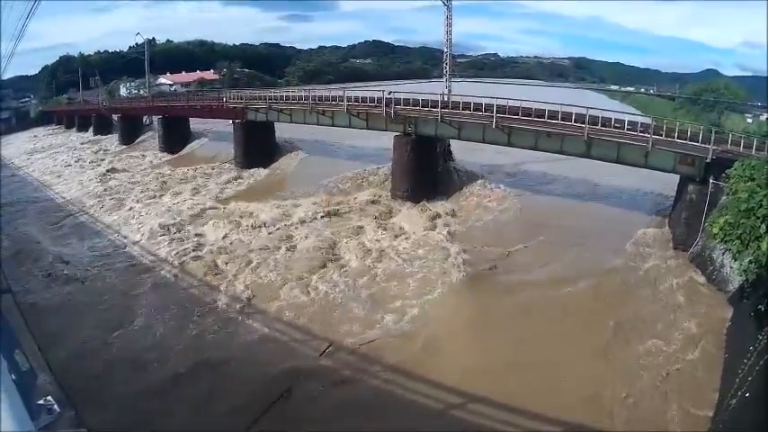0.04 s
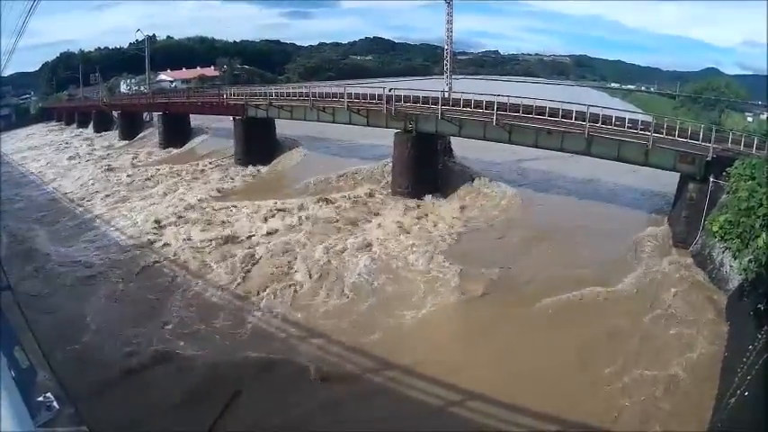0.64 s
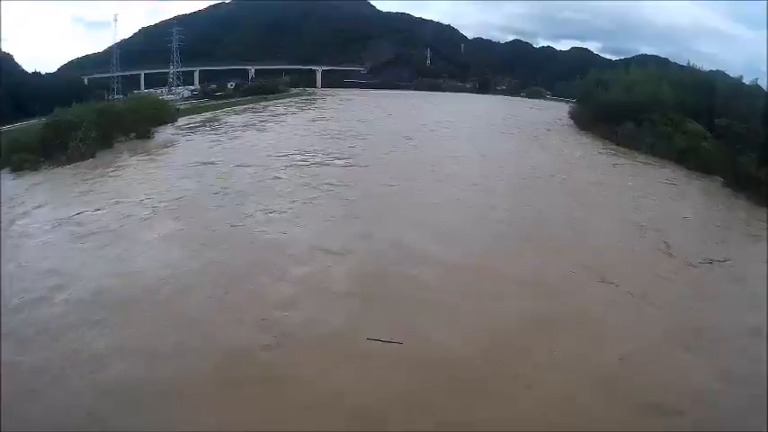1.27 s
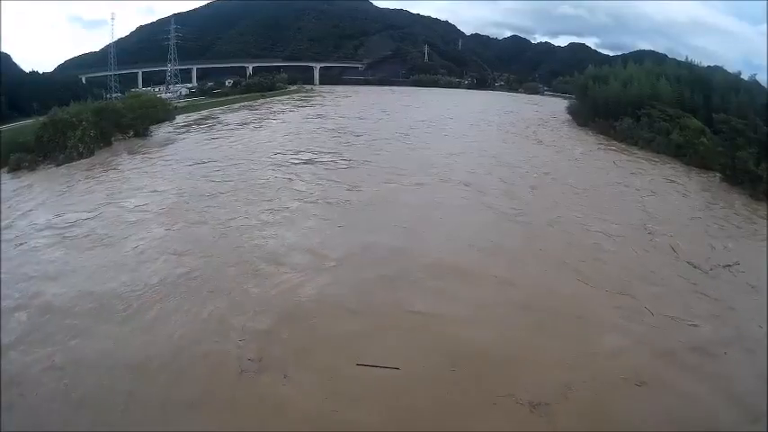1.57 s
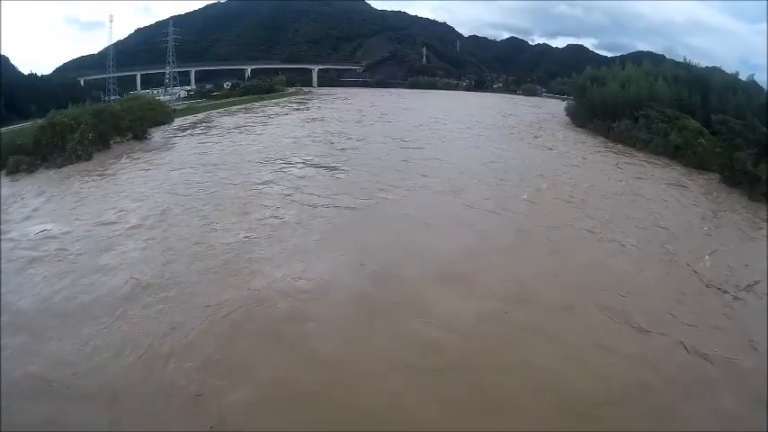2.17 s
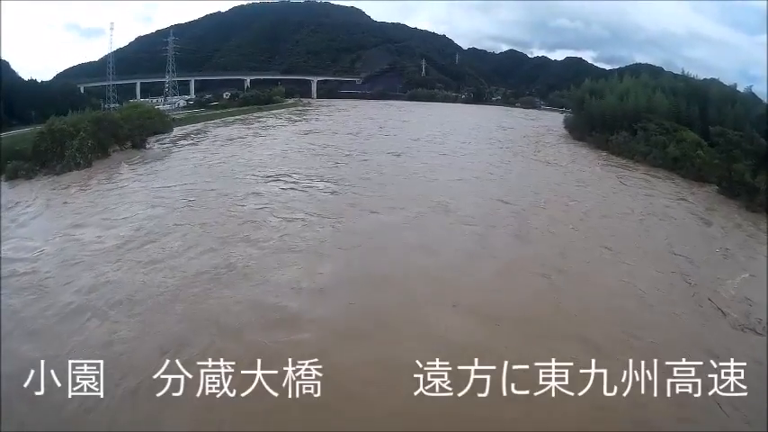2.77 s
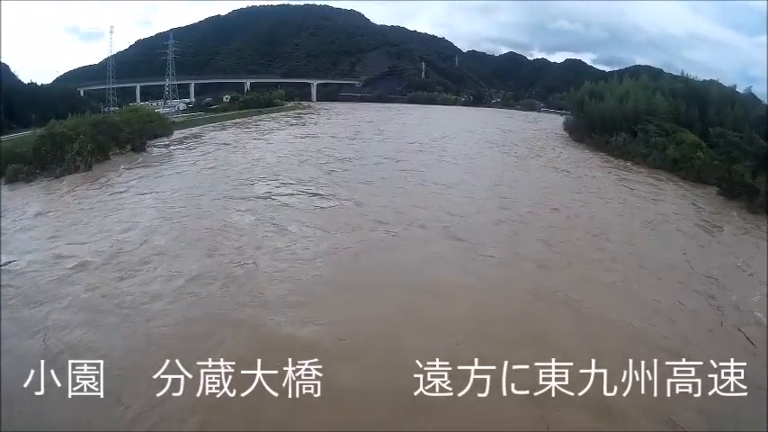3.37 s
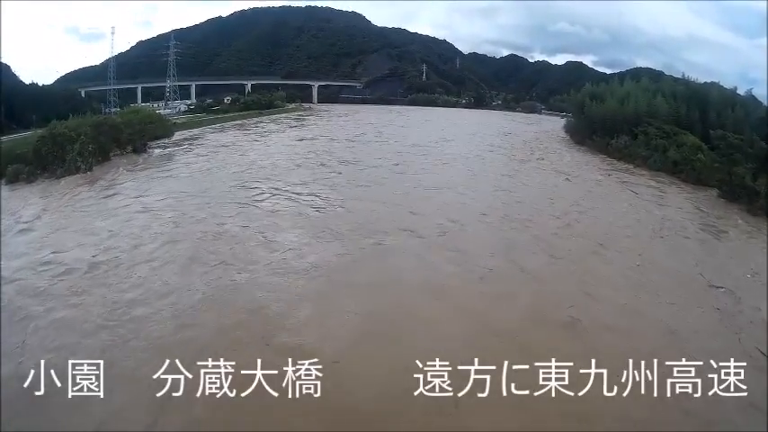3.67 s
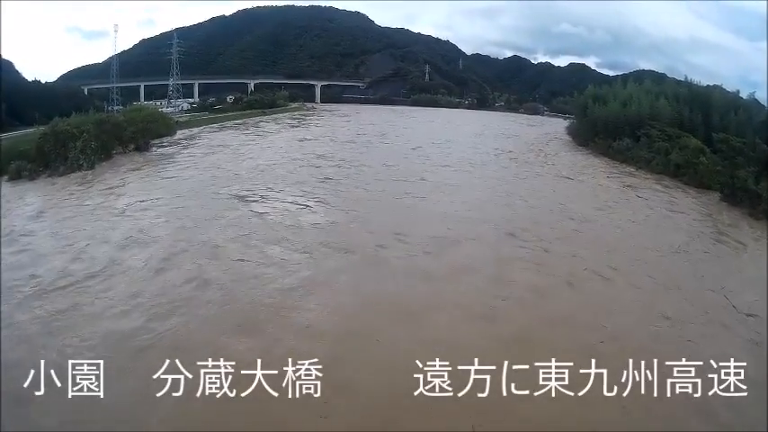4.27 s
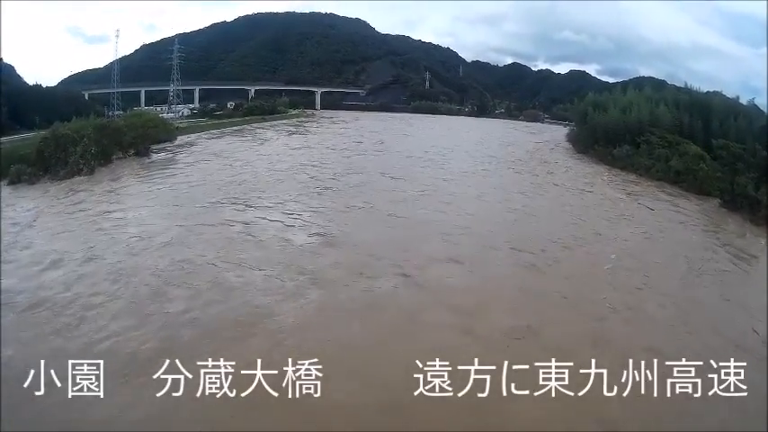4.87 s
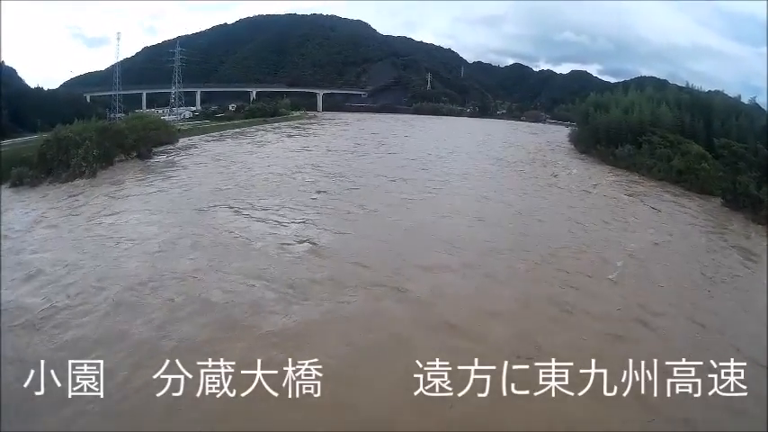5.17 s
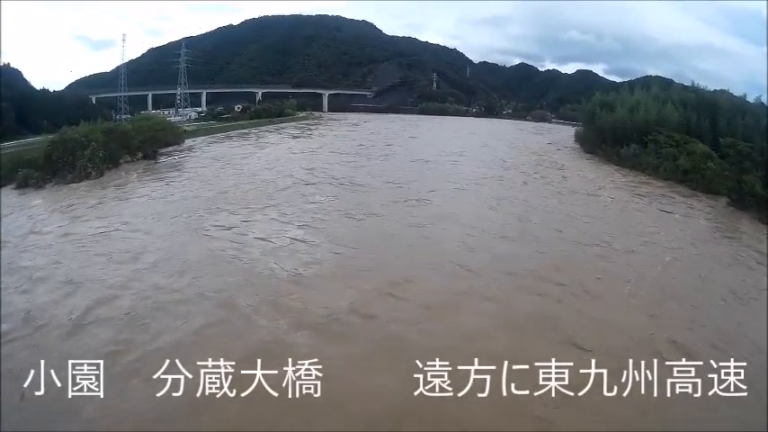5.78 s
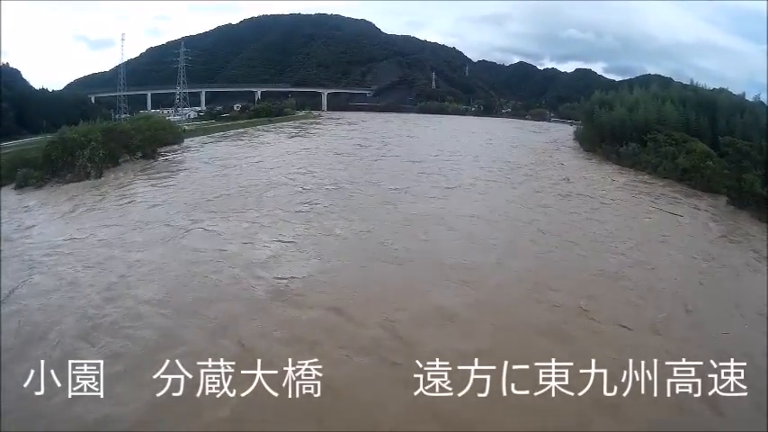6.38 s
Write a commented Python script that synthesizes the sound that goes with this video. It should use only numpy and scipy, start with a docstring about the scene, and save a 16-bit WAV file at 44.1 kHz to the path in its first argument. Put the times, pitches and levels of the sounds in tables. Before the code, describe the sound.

A dense roar of river rapids switches abruptly to the soft, steady rush of a broad current, with wind buffeting near the end.

```python
"""White water roars between the piers, heard from a bridge over a muddy river in flood.
Then, abruptly, a wide smooth reach rumbles much more quietly, and a gust buffets the microphone.
Both waters are swarms of ringing bubbles over a wash of churning foam,
with a few faint slaps of falling crests and splashes of thrown drops."""
import sys
import numpy as np
from scipy import signal
from scipy.fft import rfft, irfft
from scipy.io import wavfile

SR = 44100
rng = np.random.default_rng(int(sys.argv[2]) if len(sys.argv) > 2 else 0)


def transcribe(u):
    """Save the signal u as a 16-bit wav file named by the first command-line argument.

    u: samples, shape (n,) or (channels, n), limited to [-1, 1]; the rate is SR.
    q: integer samples, one column per channel.
    """
    v = np.clip(np.atleast_2d(u).T, -1, 1)
    q = np.round(v * 32767).astype(np.int16)
    wavfile.write(sys.argv[1], SR, q)


N = 287973
TIME = np.arange(N) / SR
HZ = np.maximum(np.arange(N // 2 + 1) * SR / N, 1)
REACH_START_S = 1.071


def from_db(db):
    """Decibels to gain."""
    return 10 ** (np.asarray(db) / 20)


def rms_one(x):
    """Scale to unit power."""
    return x / np.sqrt(np.mean(x ** 2) + 1e-20)


def colour(points):
    """Gain at every frequency from (Hz, dB) points."""
    hz, db = np.transpose(points)
    return from_db(np.interp(np.log(HZ), np.log(hz), db))


def filtered(x, gain):
    """Apply a gain per frequency."""
    return irfft(rfft(x) * gain, N)


def drift(rate_hz):
    """A smooth random curve, mostly slower than rate_hz; rms 1."""
    return rms_one(filtered(rng.standard_normal(N), 1 / (1 + (HZ / rate_hz) ** 2)))


def in_time(points):
    """Join (s, value) points by straight lines."""
    return np.interp(TIME, *np.transpose(points))


def band_pass(x, low_hz, high_hz):
    """Keep one band; rms 1."""
    return rms_one(signal.sosfilt(signal.butter(2, [low_hz, high_hz], "band", fs=SR, output="sos"), x))


def burst(peak_s, length):
    """An envelope that swells fast to 1 at peak_s and dies away more slowly."""
    age = np.maximum(TIME - peak_s + length / 2, 0) / (length / 2)
    return age * np.exp(1 - age)


# Spray landing below the bridge. Each row: peak time in seconds, level in dB, length in seconds.
SPRAY_SPLASHES = [(0.639, -37.5, 0.0055), (3.373, -69, .035), (3.85, -69, 0.042), (5.315, -59, .004)]


def splashes(drops_per_s=2500):
    """Thrown drops patter back onto the surface in short showers."""
    drops = (rng.random(N) < drops_per_s / SR) * rng.standard_normal(N)
    patter = band_pass(drops, 3280, 4600)
    return patter * sum(from_db(db) * burst(peak_s, length) for peak_s, db, length in SPRAY_SPLASHES)


# Waves out on the river, faint from the bridge.
# Each row: peak time in seconds, level in dB, pitch in Hz, length in seconds.
WAVE_SLAPS = [(2.49, -51, 1650, .04), (3.835, -59, 2230, .05), (4.695, -49, 1200, 0.057),
              (5.318, -41, 1600, 0.004), (6.341, -42, 650, 0.027)]


def slaps(band_ratio=1.21):
    """A crest falls over: a brief hollow burst that swells fast and dies away."""
    out = np.zeros(N)
    for peak_s, db, hz, length in WAVE_SLAPS:
        body = band_pass(rng.standard_normal(N), hz / band_ratio, hz * band_ratio)
        out += from_db(db) * burst(peak_s, length) * body
    return out


# The tone of air right on the microphone. Each row: frequency in Hz, relative level in dB.
WIND_SPECTRUM = [(8, -4), (18, 7), (45, -1), (90, -3.5), (200, -12.5), (400, -21), (900, -40), (3000, -70)]
# Light air on the bridge, and one gust. Each row of both: time in seconds, level in dB.
BREEZE_LEVELS = [(1.1, -48), (1.7, -56.5), (3.65, -52), (3.9, -47.5), (4.2, -52), (4.6, -56), (4.78, -50),
                 (5.0, -52), (5.35, -47), (5.6, -55), (6.5, -51)]
GUST_LEVELS = [(5.66, -80), (5.71, -48), (5.82, -46), (5.93, -49), (5.99, -44), (6.17, -45), (6.24, -45),
               (6.36, -80)]
# The gust's strongest eddies, striking the microphone.
# Each row: peak time in seconds, level in dB, half length in seconds, pitch in Hz.
GUST_EDDIES = [(5.742, -35.5, 0.025, 22), (5.76, -42, 0.019, 300), (5.842, -39.5, .013, 136),
               (5.982, -33, 0.011, 45), (5.999, -35.5, .016, 89), (6.071, -36.5, .013, 45),
               (6.145, -38.5, 0.057, 19)]


def wind(turbulence_db=6, flutter_db=-19, band_ratio=1.32):
    """Light air stirs at the microphone; the gust is a ragged rumble in which eddies thump and flutter."""
    tone = colour(WIND_SPECTRUM)
    breeze = rms_one(filtered(rng.standard_normal(N), tone))
    gust = rms_one(from_db(turbulence_db * drift(38)) * filtered(rng.standard_normal(N), tone))
    out = from_db(in_time(BREEZE_LEVELS)) * breeze + from_db(in_time(GUST_LEVELS)) * gust
    flutter = band_pass(rng.standard_normal(N), 170, 417)   # finer turbulence around each eddy
    low_pass = signal.butter(2, 700, fs=SR, output="sos")
    for peak_s, db, half_length, hz in GUST_EDDIES:
        swell = np.exp(-((TIME - peak_s) / half_length) ** 2)
        band = signal.butter(1, [hz / band_ratio, hz * band_ratio], "band", fs=SR, output="sos")
        eddy = swell * signal.sosfilt(np.vstack([band, low_pass]), rng.standard_normal(N))
        thump = eddy * np.sqrt(np.sum(swell ** 2) / np.sum(eddy ** 2))
        out += from_db(db) * (thump + from_db(flutter_db) * swell * flutter)
    return out


def bubbles(per_s, cycles, size_db=3.0, pitches=84):
    """Bubbles of all pitches are born at random and ring down by 60 dB over the given cycles; rms 1."""
    out = np.zeros(N)
    for hz in np.geomspace(150, 15000, pitches):
        born = rng.integers(0, N, int(per_s * N / SR / pitches))
        sizes = from_db(size_db * np.minimum(rng.exponential(1, len(born)), 3))
        signs = rng.choice([-1, 1], len(born))
        clicks = np.bincount(born, sizes * signs, N) + 1e-18
        decay = from_db(-60 * hz / (cycles * SR))
        angle = 2 * np.pi * hz / SR
        rings = signal.lfilter([1, 0, -1], [1, -2 * decay * np.cos(angle), decay ** 2], clicks)
        out += np.sqrt(hz) * rms_one(rings)   # keeps the swarm's spectrum flat
    return rms_one(out)


def foam(db):
    """Countless far bubbles merge into a smooth wash."""
    return from_db(db) * rng.standard_normal(N)


def hollow_tone(hz, width_hz, stray_share=0.022, stray_db=2.0, stray_hz=3.2):
    """A hollow-sounding band of noise whose pitch and strength stray slowly; rms 1."""
    noise = rng.standard_normal(N)
    pitch = hz * (1 + stray_share * drift(stray_hz))
    carrier = np.exp(2j * np.pi * np.cumsum(pitch) / SR)
    low_pass = signal.butter(2, width_hz / 2, fs=SR, output="sos")
    band = signal.sosfilt(low_pass, noise / carrier) * carrier
    return rms_one(band.real * from_db(stray_db * drift(stray_hz)))


# The wash of the wide reach, from the bridge. Each row: frequency in Hz, relative level in dB.
REACH_SPECTRUM = [(12, -21), (22, -7), (70, -3), (120, 0.5), (160, -1), (230, -1), (340, -2.1), (470, -2.5),
                  (580, -1.3), (720, -1), (900, -5), (1180, -6), (1450, -11.5), (1850, -12.1),
                  (2600, -22.5), (3300, -31.5), (4000, -34), (5500, -41), (10000, -46)]
# Hollow tones in the river's wash, coloured by a short reflection off the bridge.
# Each row: pitch in Hz, width in Hz, starting level against the wash in dB, rise in dB per second.
HOLLOW_TONES = [(689, 175, -11.5, -0.5), (1130, 230, -20, 0), (1705, 56, -23.5, 0.5)]
# The current's low body. Each row: pitch in Hz, width in Hz, level against the wash in dB.
BODY_TONES = [(238.4, 76, -12.5), (342, 100, -13.5)]
# Swells of that body, and of the whole current. Each row of both: time in seconds, gain in dB.
BODY_SWELLS = [(1.1, -3.5), (2.1, -2), (2.7, 4), (3.4, 1.5), (4.05, -2), (4.4, 1), (5.2, -4), (5.6, 2.5),
               (5.95, -8), (6.3, 6.5), (6.5, 0)]
CURRENT_SWELLS = [(1.1, -0.1), (1.35, -0.5), (1.8, -1), (2.08, 0.9), (2.5, -0.5), (2.8, -0.5), (3.25, -0.5),
                  (3.43, 0.9), (3.65, -.2), (3.88, .5), (4.05, -0.5), (4.3, 0.3), (4.48, -1), (4.68, 0.1),
                  (4.85, -1.1), (5.2, 0.4), (5.5, 0.05), (6.33, 0.5), (6.5, -.4)]


def reach(rumble_db=-42.5, ripples_db=-51, rumble_db_per_s=0.0455, ripples_db_per_s=0.19):
    """The broad current rumbles with shifting hollow tones; surface ripples add a lighter wash."""
    elapsed = TIME - REACH_START_S
    churn = bubbles(per_s=14000, cycles=11.0) + foam(db=2.0)
    flow = rms_one(filtered(churn, colour(REACH_SPECTRUM)))
    for hz, width, db, rise in HOLLOW_TONES:
        flow += from_db(db + rise * elapsed) * hollow_tone(hz, width)
    for hz, width, db in BODY_TONES:
        flow += from_db(db + in_time(BODY_SWELLS)) * hollow_tone(hz, width)
    deep = 1 / (1 + (HZ / 1200) ** 6)   # rumble below 1200 Hz, ripples above
    rumble = from_db(rumble_db + rumble_db_per_s * elapsed) * rms_one(filtered(flow, deep))
    ripples = from_db(ripples_db + ripples_db_per_s * elapsed) * rms_one(filtered(flow, 1 - deep))
    return from_db(in_time(CURRENT_SWELLS)) * (rumble + ripples)


# White water at the piers, below the microphone. Each row: frequency in Hz, relative level in dB.
RAPIDS_SPECTRUM = [(12, -30), (22, -5.5), (85, -2), (150, -2), (210, 0), (300, -0.9), (400, -5), (580, 1),
                   (800, -4.5), (1080, -2), (1380, -6.5), (1750, -7.5), (2100, -12.5), (2350, -12.5),
                   (2600, -16), (3300, -30.5), (5100, -35), (6000, -39.5), (9600, -47.5), (15000, -60.5)]
# Peaks colouring the roar; the three in the treble are resonances of the microphone housing.
# Each row: centre in Hz, width in Hz, lift in dB.
COLOURING_PEAKS = [(522, 26, 3), (600, 54, 2), (1564, 68, 4), (1720, 38, 4.5), (1880, 60, 3.5),
                   (3940, 680, 7.5), (7360, 1650, 6), (12040, 1900, 10)]


def rapids(level_db=-20.0, clump_db=0.7, surge_db=0.77):
    """Standing waves break at the piers in a dense roar: clumps of bubbles surge with the foam."""
    swarm = rms_one(bubbles(per_s=16000, cycles=16.5) * from_db(-clump_db * drift(26)))
    churn = (swarm + foam(db=4.0)) * from_db(surge_db * drift(7.2))
    lift_db = sum(db * np.exp(-2 * ((HZ - hz) / width) ** 2) for hz, width, db in COLOURING_PEAKS)
    tone = colour(RAPIDS_SPECTRUM) * from_db(lift_db)
    return from_db(level_db) * rms_one(filtered(churn, tone))


def scene():
    """The rapids give way within 2 ms to the quiet reach; slaps, splashes and wind lie on top, in mono."""
    at_piers = np.clip((REACH_START_S - TIME) / .002, 0, 1)
    river = at_piers * rapids() + (1 - at_piers) * reach()
    return (river + slaps() + splashes() + wind())[None]


def record(dry, hiss_db=-66, cutoff_hz=15150):
    """The microphone adds its own even hiss; the highest treble is cut."""
    hiss = from_db(hiss_db) * rng.standard_normal(dry.shape)
    top_cut = signal.ellip(10, .1, 80, cutoff_hz, fs=SR, output="sos")
    fade_in = np.clip(TIME / .002, 0, 1)
    return signal.sosfilt(top_cut, fade_in * (dry + hiss))


dry = scene()
out = record(dry)
transcribe(out)
```